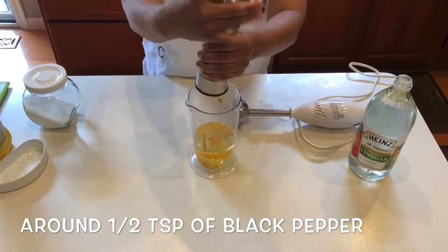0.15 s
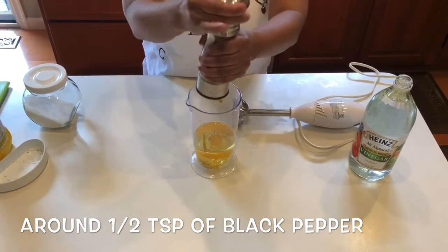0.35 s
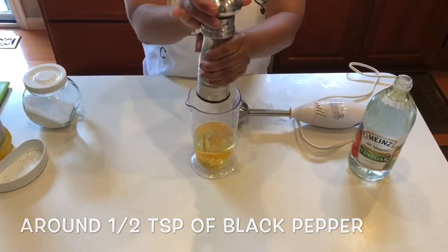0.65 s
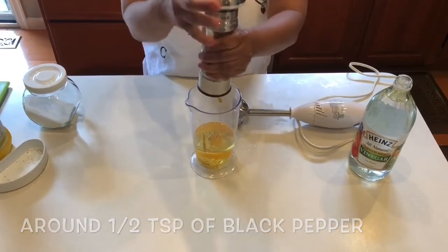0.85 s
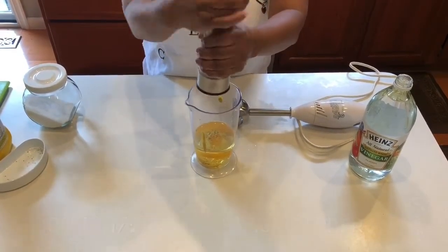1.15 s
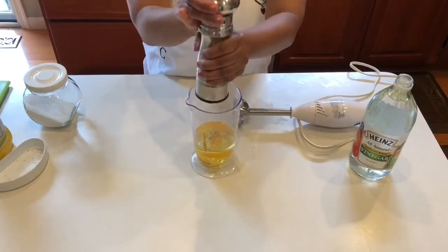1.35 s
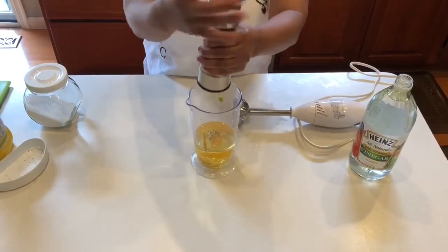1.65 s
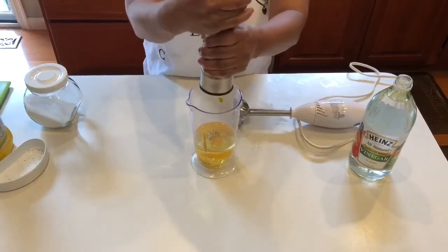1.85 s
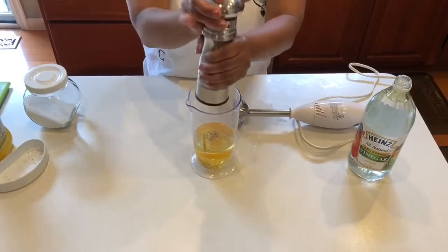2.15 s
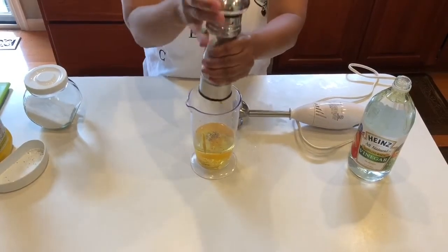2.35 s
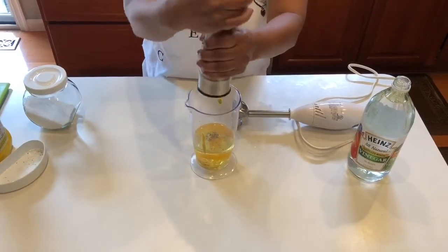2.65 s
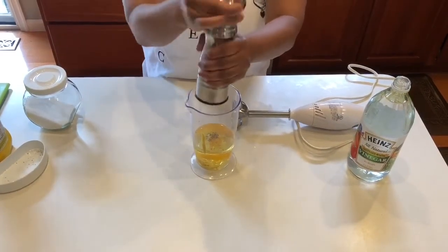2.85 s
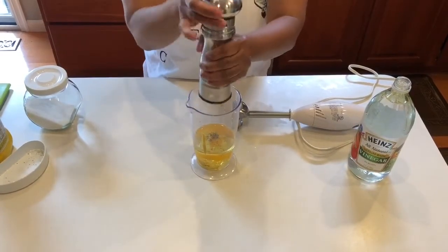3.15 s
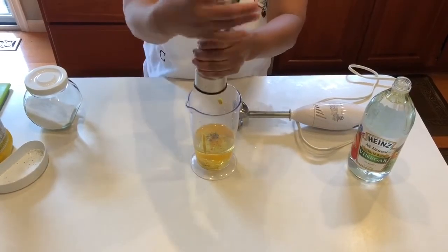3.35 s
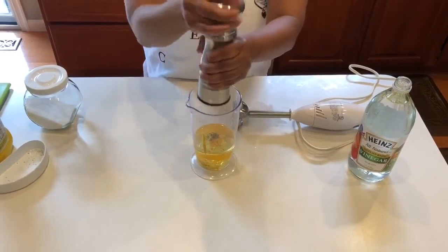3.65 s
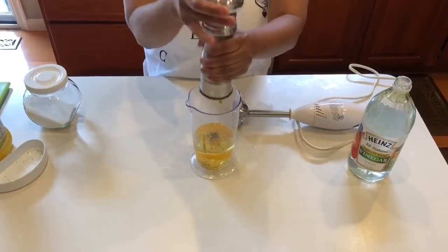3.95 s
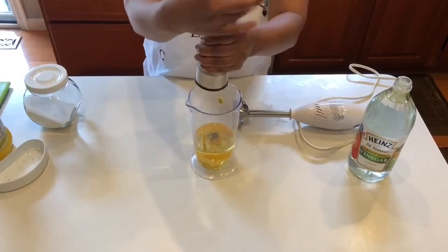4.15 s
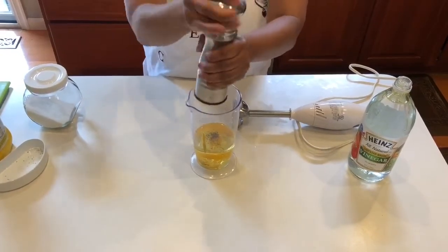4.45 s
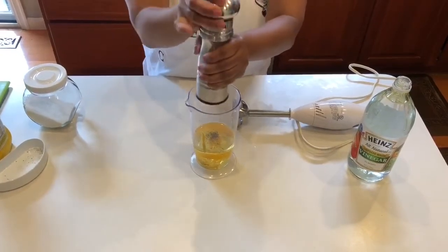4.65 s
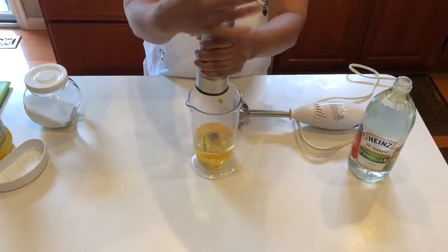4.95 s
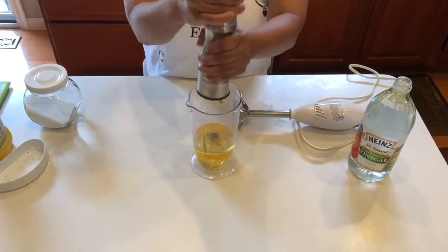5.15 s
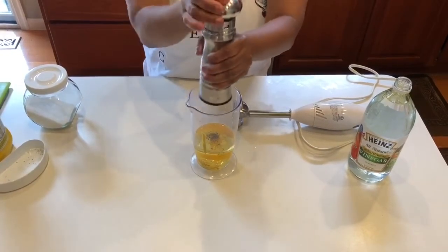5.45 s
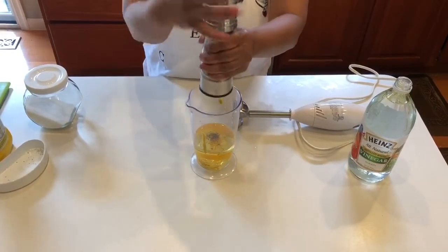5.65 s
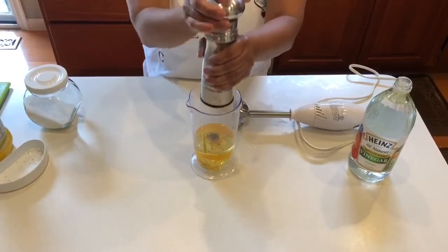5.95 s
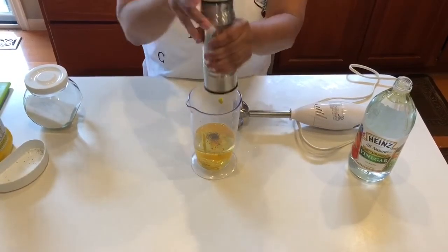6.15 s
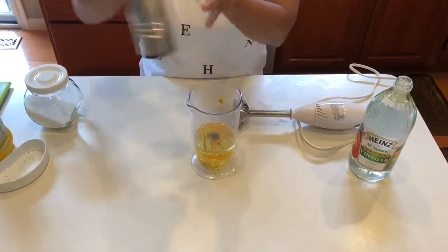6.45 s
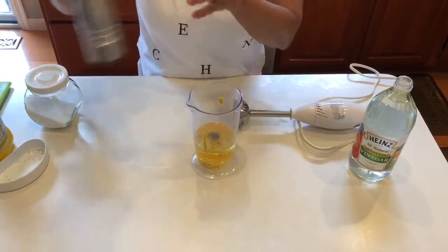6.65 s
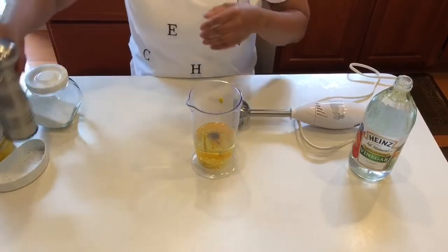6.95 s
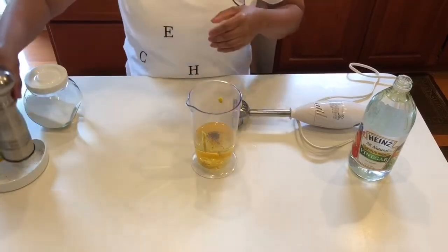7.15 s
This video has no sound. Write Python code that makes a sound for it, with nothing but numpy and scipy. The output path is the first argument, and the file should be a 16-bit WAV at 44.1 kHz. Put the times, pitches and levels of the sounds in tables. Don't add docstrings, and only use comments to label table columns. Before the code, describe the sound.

Eight gritty twists of a metal pepper grinder crack and knock at an even pace, with light cap clinks between, above a soft kitchen drone.

```python
import sys
import numpy as np
from scipy import signal
from scipy.fft import rfft, irfft
from scipy.io import wavfile

SR = 44100
rng = np.random.default_rng(int(sys.argv[2]) if len(sys.argv) > 2 else 0)


def unload_audio(sound):
    columns = np.transpose(np.atleast_2d(sound))
    steps = np.round(np.clip(columns, -1, 1) * 32767)
    wavfile.write(sys.argv[1], SR, steps.astype(np.int16))


def gain_from_db(level_db):
    decades = np.asarray(level_db, float) / 20
    return 10 ** decades


N = 322001

# frequency in Hz, rms level in dB.
MOTOR_TONES = [(55.43, -60), (58.86, -65), (117.67, -53), (120.05, -103), (221.7, -67), (266, -70),
               (294, -66), (347, -82)]
# frequency in Hz, level in dB per Hz.
AIR_SPECTRUM = [(18, -40.5), (34, -17), (48, -10), (134, -5), (170, -8.5), (374, -12.5), (526, -19.5),
                (600, -19), (889, -26.5), (1350, -30), (1810, -34), (2170, -37), (2980, -40), (8520, -47),
                (16000, -53.5)]
# frequency in Hz, T60 in seconds, tail level in dB.
ROOM_DECAY = [(497, 0.48, -1.5), (1510, 0.69, -2.5), (4000, 0.67, -1.5), (7230, 0.58, -3),
              (10230, 0.37, -4), (14400, 0.19, -5.5)]
# time in seconds, fade-out in seconds, fade-in in seconds.
LEVEL_DIPS = [
    (1.206, 0.068, 0.017),
    (6.536, 0.03, 0.038),
]
# frequency in Hz, width in Hz, level in dB.
RIM_MODES = [(2780, 87, -12), (3340, 17, 1), (5260, 30, -14), (5590, 66, 0), (7670, 40, -11),
             (10200, 32, -13), (11850, 92, -19), (12800, 64, -16)]
# frequency in Hz, width in Hz, level in dB.
SHELL_MODES = [(2273, 97, 5.5), (3140, 200, 6.5), (4120, 380, -2.5), (5640, 290, 8), (6760, 450, -5),
               (8520, 100, 4), (11000, 260, -28), (13400, 400, 1.5)]
# frequency in Hz, width in Hz, level in dB.
HOLLOW_MODES = [(872, 61, 7.5), (960, 31, 8.5), (1150, 140, 4.5), (1440, 500, -0.5), (1640, 230, 2.5),
                (2167, 680, -9)]
# time in seconds, level in dB.
RIM_SCRAPE = [(6.245, -75), (6.262, -70), (6.28, -72), (6.287, -51.5), (6.297, -59), (6.335, -68),
              (6.35, -87), (6.39, -91)]
# time in seconds, clink in dB, blur in dB, skin tick in dB, tick brightness in dB.
CAP_TAPS = [(0.0643, -65, -2, -55, -8.5), (0.7502, -63.5, 8, -51, -7.5), (0.9582, -63, -13, -38, -0.5),
            (1.498, -44.5, 5, -48, -8), (1.5364, -59, 2, -51, 11), (1.7385, -61, 7, -47, 2),
            (2.279, -54.5, 3, -47, -5.5), (2.3341, -67, 0, -42.5, 2.5), (3.1582, -48.5, -6, -43.5, -4),
            (3.2, -59, -3, -47, 6), (3.9152, -52, 2, -36, -2.5), (3.9569, -57, -4, -45, 4),
            (4.4702, -44, 11, -66, 2), (4.7396, -55.5, 7, -48, -8), (4.805, -59, 5, -48.5, 9),
            (5.47, -45.5, 11.5, -37.5, 1.5), (5.5605, -44, 8, -52, -9.5)]
# start in seconds, swell in seconds, ease in seconds, body in dB, crumbs in dB.
TWISTS = [(0.31, .13, 0.058, -41.5, -61), (1.09, 0.057, 0.3, -38.5, -53), (1.86, 0.08, 0.26, -40.5, -53.5),
          (2.629, .2, 0.19, -40.5, -60.5), (3.459, 0.16, 0.077, -35.5, -49),
          (4.27, 0.088, .25, -44.5, -54.5), (5.05, 0.038, 0.14, -38.5, -57), (5.79, 0.054, .06, -34, -52)]
# time in seconds, peak in dB, pitch in
# Hz.
MILL_KNOCKS = [(0.299, -34.5, 1026), (0.334, -38.5, 875), (0.394, -37.5, 1650), (1.133, -37.5, 845),
               (1.228, -42.5, 1056), (1.894, -35.5, 1020), (1.919, -38.5, 755), (1.932, -37, 1020),
               (1.976, -43.5, 870), (2.016, -42.5, 1150), (2.075, -40.5, 1570), (2.654, -39, 1047),
               (2.76, -41.5, 990), (2.781, -37.5, 1020), (2.801, -43, 1470), (2.839, -41, 1060),
               (2.936, -43, 1700), (3.567, -45, 940), (3.597, -35, 1080), (3.632, -40.5, 1520),
               (4.311, -34.5, 1036), (4.326, -38.5, 970), (4.347, -31, 973), (5.065, -41, 1600),
               (5.083, -36.5, 900), (5.156, -28.5, 1280), (5.819, -33, 996), (5.836, -48, 1150),
               (5.851, -34.5, 960), (5.883, -38, 980),
               (0.204, -57.5, 1230), (0.359, -42, 1100), (0.525, -49.5, 1710), (0.96, -48.5, 900),
               (1.109, -46.5, 1560), (1.159, -43, 1020), (1.344, -51.5, 1360), (1.503, -50.5, 676),
               (1.706, -51, 665), (2.511, -51, 630), (2.69, -50, 930), (3.377, -52, 940),
               (3.492, -47.5, 870), (3.508, -46, 1000), (3.537, -49, 840), (4.269, -48, 960),
               (4.398, -41.5, 1675), (4.47, -45.5, 1710), (4.723, -60, 1080), (5.561, -56.5, 1270),
               (5.804, -45, 1050), (5.865, -45, 1090)]
# time in seconds, peak in dB, mid re peak in dB, top re peak in dB, ring in Hz.
SPLITS = [(0.2991, -19, -10, -8.5, 5560), (0.334, -18, -13, -3, 7250), (0.394, -26, -10, -1, 7300),
          (1.215, -26, -36, -7, 4020), (1.894, -16.5, -8, -5.5, 7920), (2.6905, -33, -12, -8, 6850),
          (2.7513, -31.5, -8, -9, 5940), (2.803, -29.5, -14, -7, 6630), (2.9362, -29, -5, -17, 3340),
          (3.503, -35, -14, -6.5, 7500), (4.3128, -32, -17, -9, 5830), (4.347, -36.5, 3, -19, 3720),
          (4.471, -30.5, -38, -6.5, 5870), (5.1595, -11.5, -17.5, -9, 7070)]
# time in seconds, peak in dB, mid re peak in dB, top re peak in dB, ring in Hz.
CRUSHES = [(2.7706, -35, -4.5, -9, 8140), (2.784, -37, -21, -16, 5680), (3.6173, -37, -10, -1, 7400),
           (4.3246, -35, -7, -16, 6000), (4.355, -35.5, -12, -9, 5760), (4.399, -34.5, -4, -7, 6400),
           (5.095, -32.5, -7, -6, 6600), (5.1552, -20.5, -6.5, 1, 5830), (5.7872, -30.5, -9, -17, 5640),
           (5.8815, -30.5, -5, -9, 5590)]
# time in seconds, peak in dB, brightness in dB.
CRACKLES = [(0.5232, -42, 0), (1.11, -52, -9), (1.1326, -44, 1), (1.1396, -40, 3), (1.1623, -39, 10),
            (1.8615, -40, -7.5), (2.017, -35, 4), (2.0727, -38.5, 1), (2.6514, -36, 1.5), (2.6705, -40, 2),
            (2.7356, -37, 7), (2.8645, -42, 4), (3.5373, -41, 1), (3.556, -39, 8), (3.5945, -39, 2),
            (4.2637, -49, 0), (4.4413, -37, 4), (4.569, -45, -3.5), (5.0666, -43.5, 2), (5.0814, -42.5, -9),
            (5.8156, -39, -7), (5.9115, -43, 7)]
# time in seconds, peak in dB, brightness in dB.
FINGER_SLIPS = [(1.065, -60, -15.5), (1.708, -53, -2), (2.5092, -63, 16), (2.541, -56, 4),
                (3.3703, -50, -5), (3.3957, -52, 0), (3.9809, -48, 7), (4.147, -61, -9), (4.1779, -69, -20),
                (4.79, -51, 5), (4.983, -67, -20.5), (5.548, -45.5, 10), (6.1828, -57.5, 9),
                (6.2322, -58.5, -2), (6.2592, -58, -3), (6.2866, -48.5, 7), (6.658, -48.5, 5.5),
                (6.6977, -54, 3)]

BANDS_HZ = 350 * 2 ** np.arange(0, 5.6, .5)
BEAT_CREST_S = 3.36
AIR_DB, MOTOR_RATTLE_DB = -54, 3.0
BASS_CUT_HZ = 45
CAP_HZ, CAP_SPREAD = 6250, .004
CAP_T60_S, CAP_WAVER_DB = .42, 3.5
CAP_THIN_DB, CAP_SIDE_DB = -20, -14.5
SWELL_DB, EASE_DB = 23.5, 24.5
SPLIT_MS, CRUSH_MS, SMALL_MS = 2.8, 6.9, 3.3
SMALL_MID_DB, SMALL_TOP_DB = -5, -11
SMALL_RING_HZ, SMALL_RING_SPREAD = 6010, 0.1076


def in_time(rows, outside):
    s, *columns = np.transpose(rows)
    return np.array([np.interp(np.arange(N) / SR, s, c, outside, outside) for c in columns])


def at_hz(points, hz, column=1):
    points = np.array(points)
    return np.interp(np.log(hz), np.log(points[:, 0]), points[:, column])


def rms_one(x):
    return x / np.sqrt(np.mean(x ** 2) + 1e-20)


def band(x, low_hz, high_hz):
    sos = signal.butter(2, [low_hz, min(high_hz, .45 * SR)], "band", fs=SR, output="sos")
    return signal.sosfilt(sos, x)


def resonances(x, modes):
    out = 0
    for k, (hz, width_hz, db) in enumerate(modes):
        r = np.exp(-np.pi * width_hz / SR)
        poles = [1, -2 * r * np.cos(2 * np.pi * hz / SR), r * r]
        ringing = signal.lfilter([1, 0, -1], poles, x + 1e-18)
        out = out + (-1) ** k * gain_from_db(db) * (1 - r * r) / 2 * ringing
    return out


def grit(per_s, spread_db):
    sizes = gain_from_db(spread_db * np.minimum(rng.exponential(1, N), 4)) * rng.choice([-1, 1], N)
    return rms_one(sizes * (rng.random(N) < per_s / SR))


def flicker(rate_hz, depth_db):
    r = np.exp(-2 * np.pi * rate_hz / SR)
    drift = signal.lfilter([1], [1, -2 * r, r * r], rng.standard_normal(N))
    return gain_from_db(depth_db * rms_one(drift))


def add(track, s, shape):
    at = round(s * SR)
    track[..., at:at + shape.shape[-1]] += shape[..., :N - at]


def steel(x, ring_db):
    return x + gain_from_db(ring_db) * resonances(x, SHELL_MODES)


def hum():
    t = np.arange(N) / SR - BEAT_CREST_S
    tones = 0
    for hz, db in MOTOR_TONES:
        tone = np.sqrt(2) * gain_from_db(db) * np.cos(2 * np.pi * hz * t)
        tones = tones + tone * flicker(4.9, depth_db=MOTOR_RATTLE_DB * (hz > 200))
    hz = np.maximum(np.fft.rfftfreq(N, 1 / SR), 1)
    air = irfft(rfft(rng.standard_normal(N)) * gain_from_db(at_hz(AIR_SPECTRUM, hz)), N)
    return tones + gain_from_db(AIR_DB) * flicker(3.3, depth_db=1.41) * rms_one(air)


def scattered(x):
    out, white = 0, rng.standard_normal((2, N))
    for k, low_hz in enumerate(BANDS_HZ):
        high_hz = low_hz * np.sqrt(2)
        r = gain_from_db(-120 / (at_hz(ROOM_DECAY, low_hz * 2 ** 0.29) * SR))
        power = signal.lfilter([1 - r], [1, -r], band(x, low_hz, high_hz) ** 2)
        level = gain_from_db(at_hz(ROOM_DECAY, low_hz * 2 ** 0.31, column=2))
        out = out + rms_one(band(white[k % 2], low_hz, high_hz)) * np.sqrt(power) * level
    return np.roll(out, round(.006 * SR))


def echoes(x):
    t, tail = np.arange(SR) / SR, 0
    for low_hz in BANDS_HZ:
        noise = rms_one(band(rng.standard_normal(SR), low_hz, low_hz * np.sqrt(2)))
        noise = noise * np.sqrt(low_hz / BANDS_HZ[-1])
        level_db = at_hz(ROOM_DECAY, low_hz * 2 ** 0.44, column=2)
        t60_s = at_hz(ROOM_DECAY, low_hz * 2 ** 0.62)
        tail = tail + noise * gain_from_db(level_db - 60 * t / t60_s)
    tail = tail * np.clip((t - .004) / 0.0014, 0, 1)
    return signal.fftconvolve(x, gain_from_db(-31) * tail)[:N]


def scrape():
    contact = grit(9000, spread_db=2.5)
    return gain_from_db(in_time(RIM_SCRAPE, -200)[0]) * rms_one(resonances(contact, RIM_MODES))


def taps():
    out, t = np.zeros(N), np.arange(SR // 2) / SR
    chances = rng.standard_normal((len(CAP_TAPS), 5))
    for (s, peak_db, blur_db, _, _), chance in zip(CAP_TAPS, chances):
        hz = CAP_HZ * (1 + CAP_SPREAD * chance[4])
        mode = np.sin(2 * np.pi * hz * t)
        side_modes = np.sin(2 * np.pi * hz * np.outer([.915, .955, 1.035, 1.075], t))
        cluster = mode + gain_from_db(CAP_SIDE_DB + blur_db) * (np.sign(chance[:4]) @ side_modes)
        thin = gain_from_db(CAP_THIN_DB - blur_db - 60 * t / CAP_T60_S) * mode
        add(out, s, gain_from_db(peak_db - 0.5) * (gain_from_db(-60 * t / 0.034) * cluster + thin))
    return out * flicker(90, depth_db=CAP_WAVER_DB)


def load():
    t, out = np.arange(N) / SR, 0
    for s, swell_s, ease_s, body_db, crumbs_db in TWISTS:
        db = np.interp(t - s, [0, swell_s, swell_s + ease_s], [-SWELL_DB, 0, -EASE_DB], -200, -200)
        out = out + gain_from_db(db + np.array([[body_db], [crumbs_db]]))
    return out


def grinding():
    body_load, crumbs_load = load()
    dull = grit(4000, spread_db=6.0) * flicker(60, depth_db=3.0)
    body = rms_one(resonances(dull, HOLLOW_MODES))
    fine = band(grit(14000, spread_db=9.5) * flicker(80, depth_db=0.0), 1700, 13000)
    crumbs = rms_one(steel(fine, ring_db=6.5))
    return gain_from_db(-6.5) * body_load * body + gain_from_db(-1.0) * crumbs_load * crumbs


def knocks():
    rings, jolts, t = np.zeros(N), np.zeros(N), np.arange(1500) / SR
    for s, peak_db, hz in MILL_KNOCKS:
        shape = gain_from_db(peak_db) * (1 - np.exp(-t / 0.0012)) * np.exp(-t / 0.0028)
        add(rings, s - .001, gain_from_db(9.5) * shape * np.sin(2 * np.pi * hz * t))
        add(jolts, s - .001, shape)
    crunch = band(band(jolts * grit(14000, spread_db=-1.5), 570, 2200), 570, 2200)
    return rings + gain_from_db(18.5) * crunch


def fractures():
    rows = [row + (SPLIT_MS,) for row in SPLITS] + [row + (CRUSH_MS,) for row in CRUSHES]
    skin_ticks = [(s, tick_db, bright_db) for s, _, _, tick_db, bright_db in CAP_TAPS]
    small = CRACKLES + FINGER_SLIPS + skin_ticks
    pitches_hz = SMALL_RING_HZ * (1 + SMALL_RING_SPREAD * rng.standard_normal(len(small)))
    for (s, db, bright_db), hz in zip(small, pitches_hz):
        rows.append((s, db, SMALL_MID_DB - bright_db, SMALL_TOP_DB + bright_db, hz, SMALL_MS))
    return rows


def snaps():
    bursts, rings = np.zeros((3, N)), np.zeros(N)
    for s, peak_db, mid_db, top_db, hz, length_ms in fractures():
        t = np.arange(round(.003 * max(length_ms, 1) * SR)) / SR
        u = t / (0.0012 * max(length_ms, 1))
        shape = np.minimum(u / 0.09, 1) * np.exp(-u ** 2.73 * 0.42)
        add(bursts, s - .001, gain_from_db(peak_db + np.array([[mid_db], [0], [top_db]])) * shape)
        add(rings, s - .001, gain_from_db(peak_db - 16) * shape ** 3 * np.sin(2 * np.pi * hz * t))
    mid, high, top = bursts * grit(18000, spread_db=-2.5)
    mid = gain_from_db(-1) * band(mid, 2100, 4470)
    high = gain_from_db(-9.0) * band(high, 3890, 7790)
    top = gain_from_db(-6) * band(band(top, 7500, 19000), 7500, 19000)
    return rings + steel(mid + high + top, ring_db=1.0)


def scene():
    crunch = snaps() + knocks() + grinding()
    metal = taps() + gain_from_db(-2.5) * scrape()
    room = gain_from_db(-11) * echoes(crunch) + gain_from_db(-6) * steel(scattered(crunch), ring_db=-4)
    metal_room = gain_from_db(-13.5) * echoes(metal)
    return (crunch + metal + gain_from_db(-1.0) * room + metal_room + hum())[None]


def band_limit(x):
    return signal.sosfilt(signal.butter(12, 15700, fs=SR, output="sos"), x)


def record(dry):
    t, gain = np.arange(N) / SR, 1
    for s, out_s, in_s in LEVEL_DIPS:
        gain = gain * np.clip(np.maximum((s - t) / out_s, (t - s) / in_s), .08, 1)
    bass_cut = signal.butter(5, BASS_CUT_HZ, "high", fs=SR, output="sos")
    top_cut = signal.cheby2(10, 60, 16600, fs=SR, output="sos")
    heard = signal.sosfilt(top_cut, signal.sosfilt(bass_cut, dry * gain))
    return band_limit(heard)


dry = scene()
out = record(dry)
unload_audio(out)
```